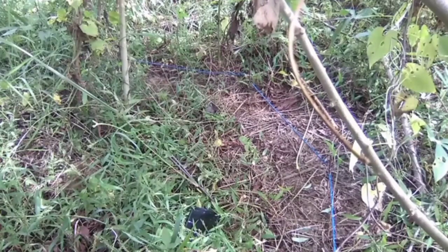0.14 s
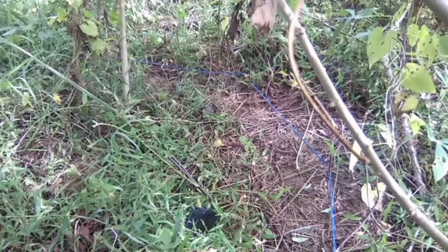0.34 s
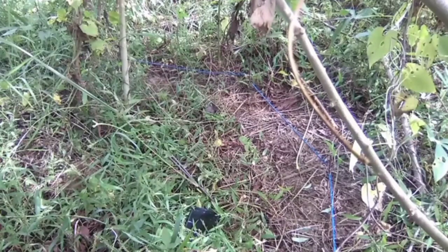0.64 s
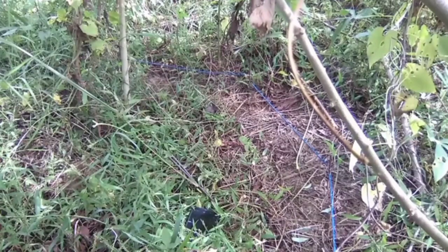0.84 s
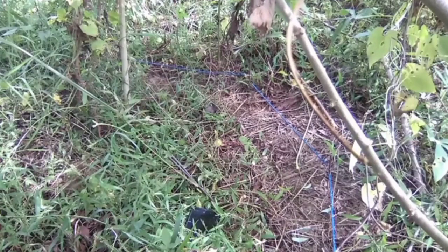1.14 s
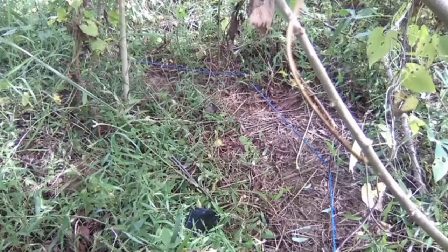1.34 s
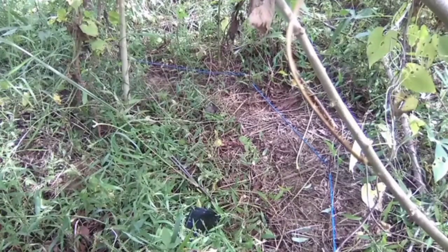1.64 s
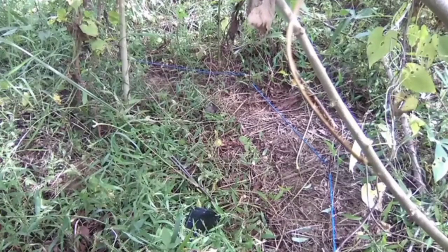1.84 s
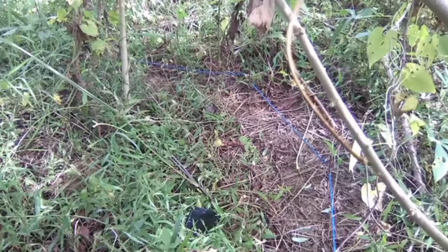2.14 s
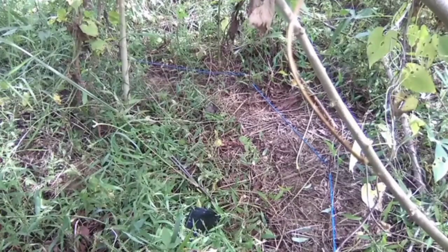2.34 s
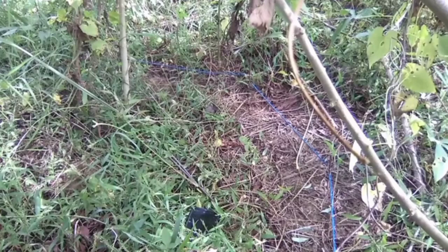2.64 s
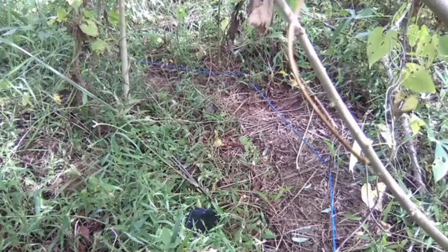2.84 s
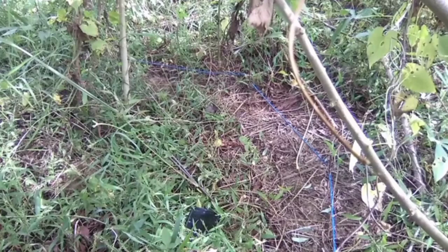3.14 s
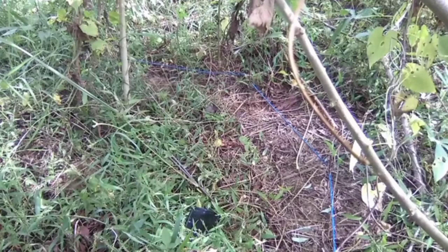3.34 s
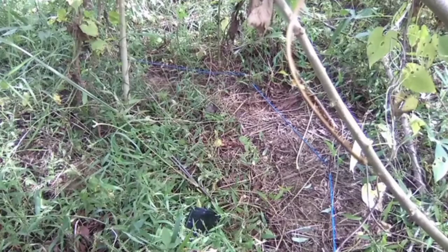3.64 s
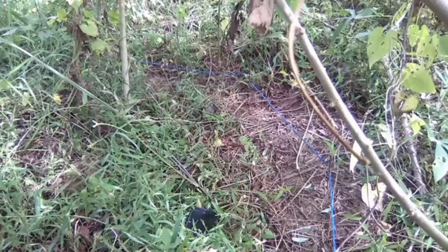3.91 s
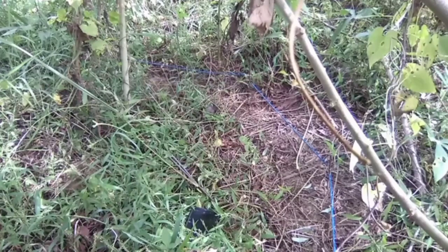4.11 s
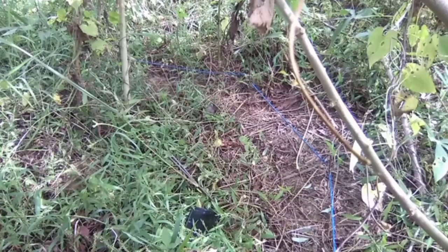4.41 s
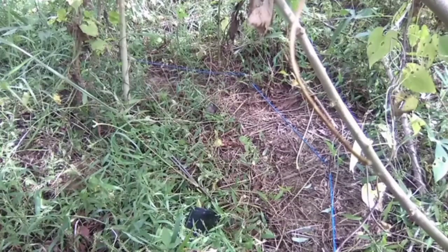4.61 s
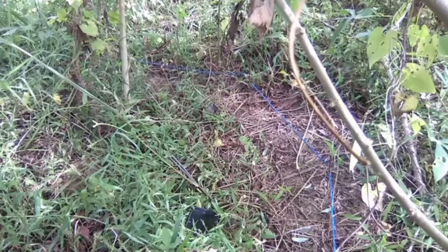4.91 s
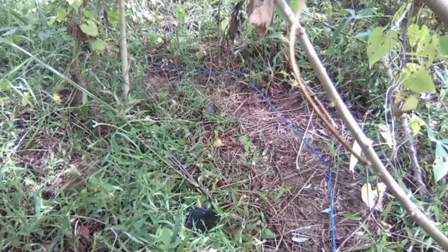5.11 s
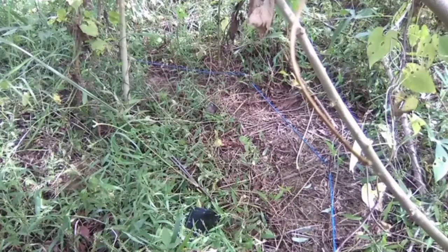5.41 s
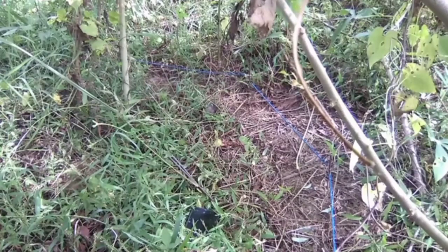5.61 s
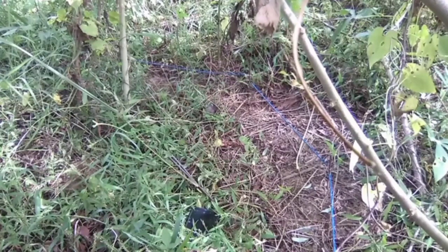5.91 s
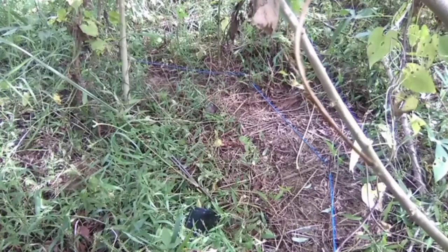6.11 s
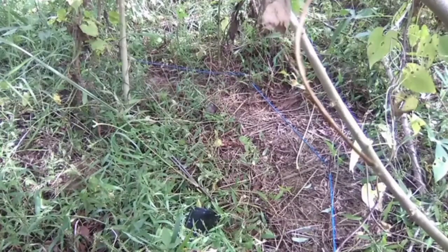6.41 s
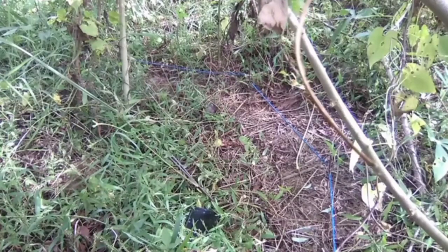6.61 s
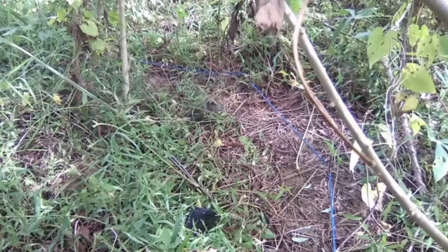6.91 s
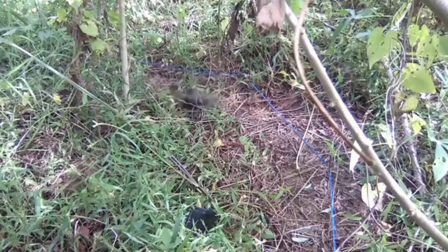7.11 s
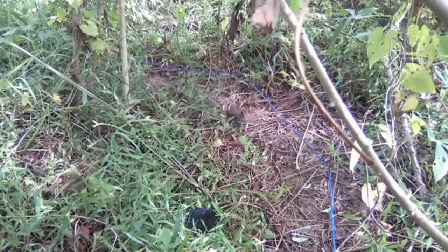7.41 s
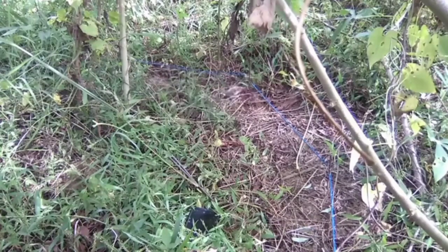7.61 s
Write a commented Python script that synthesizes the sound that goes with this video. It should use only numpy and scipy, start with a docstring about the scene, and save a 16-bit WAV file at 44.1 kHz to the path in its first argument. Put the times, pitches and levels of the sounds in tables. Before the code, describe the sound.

Undergrowth under trees, one close microphone. A high, steady insect whine with pulsed cricket bouts runs throughout. A quail close by whistles two bright notes, a lower swelling one and a fading lowest one. After several seconds of insects and faint distant bird chips, a soft bump comes, the call repeats, and dry grass crackles under running feet.

```python
"""Undergrowth below trees, one microphone: a rock quail whistles two series of four notes close by.
Two bright notes, a lower swelling one and a lowest fading one: swept partials of a single voice.
Crickets and thin buzzes are pulsed tones and narrow noise; a small far bird is short glides and echo.
Filtered noise makes soft bumps of the stand, faint air and the quail's run through dry grass near the end."""
import sys
import numpy as np
from scipy import signal
from scipy.fft import rfft, irfft, next_fast_len
from scipy.io import wavfile
from scipy.ndimage import uniform_filter1d, map_coordinates

SR = 44100
rng = np.random.default_rng(int(sys.argv[2]) if len(sys.argv) > 2 else 0)


def bounce(signal):
    """Save signal as a 16-bit WAV file at the path given by the first command-line argument."""
    frames = np.transpose(np.atleast_2d(signal))
    limited = np.clip(frames, -1, 1)
    pcm = np.round(limited * 32767).astype(np.int16)
    wavfile.write(sys.argv[1], SR, pcm)


N = 341775
TIME = np.arange(N) / SR  # seconds

# All levels are relative, before echo and flicker; pitches are centres before any waver.
# The quail's two bright opening notes, which sag, bend upward and flick down.
# Each row: start in seconds, length in seconds, pitch in Hz, upward bend in Hz, level in dB.
BRIGHT_NOTES = [(.708, .127, 3381, 286, -36), (1.007, .1145, 3436, 149.4, -35.3),
                (5.887, .129, 3337, 280, -36), (6.183, .1175, 3395, 175, -36)]
# Its third note, held and then swelling as it droops.
# Each row: start in seconds, length in seconds, pitch in Hz, level in dB, swell in dB.
SWELLING_NOTES = [(1.254, .148, 3203, -42, 6.5), (6.429, .14, 3193, -39.5, 5)]
# Its last note, climbing a little, then sinking and fading.
# Each row: start in seconds, climb in seconds, fall in seconds, top pitch in Hz, level in dB.
FADING_NOTES = [(1.498, .049, .205, 2980, -44), (6.656, 0.058, 0.2096, 2974, -41.5)]
# Every note slides up into its pitch from a soft start.
SCOOP_S, SCOOP_HZ, ONSET_DB = .014, 186, -18.5
# Sag as a share of the bend; the voice thins at the top of the bend.
SAG_SHARE, CHOKE_DB = .28, -13.5
# The flick: time to its loudest moment, pitch and level there, last pitch.
FLICK_S, FLICK_HZ, FLICK_DB, FLICK_END_HZ = .0062, 3120, 2.5, 2726
# The third note: droop over the swell, then the closing drop.
DROOP_HZ, DROP_S, DROP_END_HZ = 197.6, .018, 2267
# The last note: its climb, then its even fall in pitch and level.
CLIMB_HZ, SINK_HZ_PER_S, FADE_DB_PER_S = 118.7, 2400, 91
# The throat passes the second harmonic and little above it. Each row: frequency in Hz, gain in dB.
THROAT = [(3800, 0), (4400, -13), (5500, -29)]
# The fundamental comes through best at the top of its range. Each row: its pitch in Hz, level in dB.
FUNDAMENTAL = [(1150, -76.5), (1260, -70.5), (1360, -69), (1480, -76.5), (1600, -74), (1690, -68.5),
               (1740, -63), (1820, -58.5)]
# Share of the overtones that leaves the beak. Each row: frequency in Hz, gain in dB.
BEAK = [(4350, -32.5), (4700, -45.5), (5200, -55.5), (5900, -51.5), (6600, -45.5), (8800, -48.5),
        (9600, -43), (10050, -25), (10400, -31.5), (11000, -49)]
# Overtones of the voice, as multiples of the fundamental.
BEAK_HARMONICS = (3, 4, 6)
# High notes add a tone an octave below the fundamental; the limit is the whistle's pitch.
SUBTONE_DB, SUBTONE_ABOVE_HZ = -58, 3260
# Air rushing through the throat. Each row: frequency in Hz, level in dB per Hz.
HUSK = [(500, -45.5), (900, -10.5), (1250, -20), (1750, -10), (2200, 1), (3100, 8.5), (3700, -3.5),
        (4300, -22), (6000, -58)]
# Grit as a bright note reaches its pitch. Each row: frequency in Hz, level in dB per Hz.
RASP = [(2500, -40), (3600, -4.5), (4100, 0), (4900, -5), (5600, -39.5)]
RASP_DB = -73

# Dry grass under the running bird. Each row: time in seconds, level in dB.
RUSTLE = [(6.821, -113), (6.854, -86), (7.025, -73.5), (7.086, -86.5), (7.236, -63.5), (7.426, -80),
          (7.614, -68), (7.702, -87), (7.75, -71)]
# Its footfalls. Each row: time in seconds, crackle level in dB, thud level in dB.
STEPS = [(7.004, -61, -94), (7.145, -64.5, -88), (7.212, -50.5, -61.5), (7.228, -71, -97),
         (7.292, -54.5, -79.5), (7.53, -69.5, -76), (7.605, -69, -94)]
# Colour of brushed dry grass. Each row: frequency in Hz, level in dB per Hz.
GRASS = [(350, -52), (600, -33), (854, -24.5), (1250, -33), (1410, -26.5), (2780, -16), (4130, -17.5),
         (6550, -9), (9190, -28.5), (10200, 1), (15400, -16.5)]
# Colour of the thuds on the ground. Each row: frequency in Hz, level in dB per Hz.
GROUND = [(60, -20), (160, -5), (300, -10.5), (480, -5), (650, -22), (1500, -20.5), (3000, -74)]

# The near cricket's bouts. Each row: start in seconds, end in seconds, level in dB.
CRICKET_BOUTS = [(0.157, 0.55, -65), (0.828, 1.332, -64.5), (1.611, 2.223, -63.5), (2.618, 3.167, -62.5),
                 (3.413, 3.8, -62), (3.854, 4.051, -60.5), (4.28, 4.863, -63.5), (5.055, 5.544, -58),
                 (5.891, 6.39, -59), (6.666, 7.19, -61), (7.418, 7.753, -61)]
BOUT_ARCH_DB = 1.5  # a bout is softer at its ends than in its middle
# A fast trill with a few pauses. Each row: start in seconds, end in seconds, level in dB.
TRILL_BOUTS = [(0, 0.735, -68.5), (1.544, 5.067, -68), (5.616, 6.557, -67.5), (7.417, 7.75, -66.5)]
TRILL_RISE_DB_PER_S, TRILL_FALL_DB_PER_S = 259.5, 199.5
# Another cricket far behind it. One row: start in seconds, end in seconds, level in dB.
FAINT_TRILL = (0, 5.1, -86)
# A higher, pulsing insect, briefly. Each row: start in seconds, end in seconds, level in dB.
HIGH_TRILL = [(0, 0.253, -70.5), (7.288, 7.752, -79.5)]
# Thin insect buzzes. Each row: start in seconds, length in seconds, level in dB.
BUZZES = [(0.046, 0.28, -73), (0.801, 0.36, -69.5), (1.52, 0.31, -72), (2.261, .25, -76),
          (3.063, 0.29, -73.5), (3.748, 0.18, -82.5), (3.899, 0.19, -72.5), (4.569, 0.26, -75),
          (5.217, 0.31, -78.5), (6.15, 0.25, -74)]

# The far bird's notes. Each row: start in seconds, pitch in Hz, glide in Hz, level in dB.
CHIPS = [(.027, 1320, -50, -89), (.44, 3970, -140, -84), (.447, 3460, -620, -80.5),
         (0.545, 2130, 78.5, -83.5), (.575, 3070, 260.5, -71), (.603, 2883, -87.5, -64.5),
         (0.646, 2780, -93, -69), (2.25, 2196, 61, -94), (2.27, 3010, -61, -82.5), (2.812, 2210, 0, -85),
         (2.925, 2200, -27, -81.5), (2.96, 2900, -150, -78), (2.964, 3250, -67.5, -64),
         (3.007, 2736, -150, -72.5), (3.048, 2623, 209.5, -64), (3.301, 2845, -39, -83.5),
         (3.64, 2940, -41, -89), (4.24, 2183, -67, -83), (4.254, 4140, -100, -89), (4.305, 2880, -93, -88),
         (4.376, 2830, 30, -80.5), (4.379, 3157, -9, -70), (4.445, 2634, -46.5, -75),
         (4.474, 2887, -460, -75), (5.195, 2510, -200, -95.5), (5.66, 2186, 34.5, -87.5),
         (5.81, 3100, -75.5, -72), (5.838, 2884, -210, -78), (7.478, 3844, -210, -75),
         (7.568, 2080, 161, -73.5), (7.595, 3000, -55, -71), (7.63, 2840, -370, -76.5)]
CHIP_S = .046  # length of each note
# Decay of the echo among the trees. Each row: frequency in Hz, time to fall 60 dB in seconds.
WOOD = [(200, 0.24), (3000, .45), (10000, 0.037)]

# Soft bumps on the microphone's stand.
# Each row: start in seconds, level in dB, time to fall 60 dB in seconds.
BUMPS = [(3.0, -75, 0.38), (3.2, -85, .3), (4.392, -66, 0.73), (4.52, -83, 0.22), (5.385, -69, 0.2),
         (6.062, -50, 0.44), (6.24, -64, 0.31), (6.929, -74.5, 0.22)]
# Colour of the shaken stand. Each row: frequency in Hz, level in dB per Hz.
STAND = [(20, -28), (38, -21.5), (55, -2.5), (78, 3), (110, -4), (150, -6), (210, -18), (300, -42.5),
         (600, -55.5), (1500, -87.5)]
# Dull knocks in the undergrowth.
# Each row: start in seconds, pitch in Hz, level in dB, time to fall 60 dB in seconds.
KNOCKS = [(0.609, 585, -84, 0.16), (2.19, 594, -84, .1), (2.62, 183, -80, 0.51)]

# Faint rumbling air. Each row: frequency in Hz, level in dB per Hz.
AIR = [(20, -20), (40, -11), (70, 4.5), (110, -6), (200, -11.5), (400, -15.5), (1000, -19.5), (3000, -22),
       (6000, -21), (11000, -23.5), (15500, -25.5)]
# Distant insects. Each row: frequency in Hz, level in dB per Hz.
CHORUS = [(5000, -64), (7500, -22), (8000, -17.5), (8400, -2), (8800, 3), (9200, -5.5), (9600, -16.5),
          (11000, -32), (14000, -67)]
TOP_HZ = 15500


def quail():
    """The throat favours the second harmonic; the bright notes end in a sharp, rough downward flick."""
    notes = [bright_note(*row) for row in BRIGHT_NOTES]
    notes += [swelling_note(*row) for row in SWELLING_NOTES]
    notes += [fading_note(*row) for row in FADING_NOTES]
    notes.sort()
    s, pitch, db = np.concatenate(notes).T
    hz = np.interp(TIME, s, pitch)
    sounding = sum(gate(path[0][0], path[-1][0], edge=.0035) for path in notes) ** 2
    # the voice falters on the highest pitches
    choked = np.clip((hz - 3430) / 150, 0, 1)
    # the blow moves evenly from point to point, and the sound grows with its square
    blowing = np.interp(TIME, s, np.sqrt(amp(db)))
    level = sounding * blowing ** 2 * amp(0.86 * wobble(90) + 3 * choked * flicker(130))
    # the tone breaks up while its pitch is falling fastest
    flick = sounding * np.clip(-np.gradient(hz) * SR / 45000, 0, 1) ** 2
    flick = uniform_filter1d(flick, size=130)
    hz = uniform_filter1d(hz, size=180) * (1 + .0024 * wobble(220) + .012 * flick * wobble(600))
    phase = phase_of(hz / 2)  # of the fundamental
    level = uniform_filter1d(level, size=30)
    whistle = filtered(level * np.sin(2 * phase), lambda f: amp(along(THROAT, f)))

    # the fundamental saturates at a soft blow; above that pitch sets its level, with a flicker
    saturated = np.tanh(level / amp(-57.5))
    fundamental = saturated * amp(along(FUNDAMENTAL, hz / 2) - 1 + 5 * flicker(35)) * np.sin(phase)
    # overtones come and go, and need a strong, steady blow
    effort = level / level.max()
    partials = sum(amp(along(BEAK, k * hz / 2) + 1.5 + 8 * flicker(40)) * np.sin(k * phase)
                   for k in BEAK_HARMONICS)
    overtones = level * effort * (1 - flick) * partials
    subtone_gain = (hz > SUBTONE_ABOVE_HZ) * amp(SUBTONE_DB + 9 * flicker(44))
    subtone = level * subtone_gain * np.sin(phase / 2 + wobble(120))
    voice = np.sqrt(2) * (whistle + fundamental + overtones + subtone)

    husk = level * effort * (amp(-35.5) + amp(-22.5) * flick) * noise(HUSK)
    near = amp(-20) * leaves(voice, t60=0.048) + amp(-11) * leaves(flick * whistle, t60=0.091)
    # the lower partial carries further into the trees, and the overtones scatter widely
    far = amp(-32) * trees(voice) + amp(-15.5) * trees(fundamental) + amp(-10.5) * trees(husk)
    far += amp(-5) * leaves(overtones, t60=0.21)
    grit = sum(blow(row[0] + SCOOP_S, t60=0.12, attack=.002) for row in BRIGHT_NOTES)
    rasp = amp(RASP_DB) * grit * noise(RASP)
    return voice + husk + rasp + near + far


def bright_note(s, length, hz, bend, db):
    """(s, Hz, dB) path: scoop, shallow sag, a choked upward bend and a loud flick."""
    top = s + length
    return [(s, hz - SCOOP_HZ, db + ONSET_DB),
            (s + SCOOP_S, hz, db),
            (s + 0.47 * length, hz - SAG_SHARE * bend, db + 0.33),
            (s + .75 * length, hz + .08 * bend, db - 1.4),
            (top, hz + bend, db + CHOKE_DB),
            (top + FLICK_S, FLICK_HZ, db + FLICK_DB),
            (top + 2.3 * FLICK_S, FLICK_END_HZ, db - 21.5)]


def swelling_note(s, length, hz, db, swell_db):
    """(s, Hz, dB) path: scoop, hold, a drooping swell and a drop."""
    end = s + length
    return [(s, hz - SCOOP_HZ, db + ONSET_DB),
            (s + SCOOP_S, hz, db - 1),
            (s + 0.5 * length, hz - 8, db + .6),
            (s + .74 * length, hz - .6 * DROOP_HZ, db + swell_db),
            (end, hz - DROOP_HZ, db + swell_db - 2.5),
            (end + DROP_S, DROP_END_HZ, db - 22)]


def fading_note(s, climb, fall, hz, db):
    """(s, Hz, dB) path: a slow climb, then pitch and level sink almost evenly until the voice stops."""
    top = s + climb
    end_hz, end_db = hz - SINK_HZ_PER_S * fall, db - FADE_DB_PER_S * fall
    return [(s, hz - CLIMB_HZ, db + ONSET_DB),
            (s + .4 * climb, hz - .55 * CLIMB_HZ, db - 4),
            (top, hz, db + 3),
            (top + fall / 4, (3 * hz + end_hz) / 4, (3 * db + end_db) / 4 - 0.5),
            (top + fall, end_hz, end_db),
            (top + fall + .012, end_hz - 60, end_db - 2)]


def running():
    """Dry grass brushes past in dense grains; each footfall adds a crackle and a light thud."""
    s, db = np.transpose(RUSTLE)
    brushing = amp(np.interp(TIME, s, db) + 2) * gate(s[0], s[-1], edge=.02)
    crackle = sum(amp(crackle_db) * blow(s, t60=0.1, attack=0.0017) for s, crackle_db, _ in STEPS)
    thud = sum(amp(thud_db) * blow(s, t60=0.14, attack=0.0028) for s, _, thud_db in STEPS)
    grains = noise(GRASS, sizes=amp(2.2 * wobble(900) + 2.5 * wobble(90)))
    snaps = amp(7.5) * stalks(per_second=210, pitch_hz=7640)
    return (brushing + crackle) * (grains + snaps) + thud * noise(GROUND)


def stalks(per_second, pitch_hz):
    """Single stalks snap at random moments, each dying within a few cycles."""
    ticks, t = np.zeros(N), np.arange(SR // 200) / SR
    start, end = RUSTLE[0][0], min(RUSTLE[-1][0], TIME[-len(t) - 1])
    for when, pitch, size in rng.random((int(per_second * (end - start)), 3)):
        hz = pitch_hz * 2 ** (2 * pitch - 1)  # up to an octave either way
        ring = np.sin(2 * np.pi * hz * t) * np.exp(-hz * t / 4)
        first = int((start + when * (end - start)) * SR)
        ticks[first:first + len(t)] += size ** 3 * ring
    return ticks


def near_cricket():
    """Bouts of separate, piercing syllables; each bout swells and eases."""
    bouts = np.zeros(N)
    for start, end, db in CRICKET_BOUTS:
        span = slice(int(start * SR), int(end * SR))
        u = np.clip((TIME[span] - start) / (end - start), 0, 1)
        closing = np.minimum((end - TIME[span]) / 0.0064, 1)
        bouts[span] = amp(db - BOUT_ARCH_DB * (2 * u - 1) ** 2) * closing
    syllables = stridulation(9040, 36.9, duty=.72, sag_hz=72, scatter_db=2.35, drift_hz=22.7,
                             starts=[row[0] for row in CRICKET_BOUTS])
    song = bouts * amp(1.58 + 3.7 * flicker(14)) * syllables
    return song + amp(-6.5) * leaves(song, t60=0.18)


def trills():
    """A fast trill with a fuzzy lower tone; a fainter cricket and a higher insect join the whine."""
    slopes = [db - TRILL_RISE_DB_PER_S * np.maximum(start - TIME, 0)
              - TRILL_FALL_DB_PER_S * np.maximum(TIME - end, 0) for start, end, db in TRILL_BOUTS]
    singing = amp(np.max(slopes, axis=0))
    wavering = singing * amp(-0.5 + 0.43 * wobble(7.7))
    fast = wavering * stridulation(7238, 51, duty=1, sag_hz=39.6, scatter_db=1, drift_hz=23.4)
    lower = singing * amp(-4.5) * narrow(7035, width_hz=120)
    start, end, faint_db = FAINT_TRILL
    faint = amp(faint_db) * gate(start, end, edge=0.088) * narrow(7100, width_hz=210)
    joining = sum(amp(db) * gate(start, end, edge=.03) for start, end, db in HIGH_TRILL)
    high = joining * stridulation(7650, 17, duty=1, sag_hz=30, scatter_db=1.5, drift_hz=70)
    return fast + lower + faint + high + leaves(fast, t60=.12)


def stridulation(pitch_hz, rate, duty, sag_hz, scatter_db, drift_hz, starts=()):
    """Each wing stroke is a smooth tone pulse that sags in pitch as the wing slows; rate in strokes/s."""
    strokes = np.cumsum(rate * (1 + 0.02 * wobble(25))) / SR
    for s in starts:  # a bout starts with a fresh stroke
        strokes[int(s * SR):] += -strokes[int(s * SR)] % 1
    count = strokes.astype(int)
    u = np.minimum((strokes - count) / np.clip(duty, .1, 1), 1)
    size = amp(scatter_db * rng.standard_normal(N // 100))[count]
    hz = pitch_hz + sag_hz * (.5 - u) + drift_hz * wobble(150)
    return unit(size * np.sin(np.pi * u) ** 2 * np.sin(phase_of(hz)))


def buzzes():
    """A thin band of noise swells and stops, mostly about every three quarters of a second."""
    swell = sum(amp(db) * np.interp(TIME, [s, s + .7 * length, s + length], [0, 1, 0])
                for s, length, db in BUZZES)
    return swell * narrow(10590, width_hz=220)


def far_bird():
    """Short wavering notes far off among the trees, with a softer echo."""
    song, quiver = np.zeros(N), 50 * wobble(200)  # quiver in Hz
    u = np.linspace(0, 1, int(CHIP_S * SR))
    swell = np.sqrt(np.abs(np.sin(np.pi * u)))
    for s, hz, glide_hz, db in CHIPS:
        span = slice(int(s * SR), int(s * SR) + len(u))
        song[span] += amp(db) * swell * np.sin(phase_of(hz + glide_hz * u + quiver[span]))
    song *= 1 + 0.088 * wobble(220)
    return amp(5) * song + leaves(song, t60=0.2) + amp(-5.5) * trees(song)


def bumps():
    """Dull shudders of the stand, and faint knocks in the undergrowth."""
    shudders = noise(STAND) * sum(amp(db) * blow(s, t60, attack=0.0055) for s, db, t60 in BUMPS)
    knocks = sum(amp(db) * blow(s, t60, attack=0.008) * narrow(hz, width_hz=31)
                 for s, hz, db, t60 in KNOCKS)
    return shudders + knocks


def background():
    """Faint rumbling air and a blur of distant insects, both as slowly wavering coloured noise."""
    air = amp(-87.5 + 0.23 * wobble(1.5)) * noise(AIR)
    chorus = amp(-74.5 + 0.44 * wobble(2.3)) * noise(CHORUS)
    return air + chorus


def trees(x):
    """Diffuse echo from trunks and leaves: a noise tail whose decay time depends on frequency."""
    hz, t, z = signal.stft(rng.standard_normal(SR), SR, nperseg=256)
    tail = signal.istft(z * amp(-60 * t / along(WOOD, hz)[:, None]), SR, nperseg=256)[1]
    return signal.fftconvolve(x, tail / np.linalg.norm(tail))[:N]


def leaves(x, t60):
    """Dense, brief scatter from the plants close by."""
    t = TIME[:SR // 8]
    scatter = rng.standard_normal(len(t)) * amp(-60 * t / t60)
    return signal.oaconvolve(x, scatter / np.linalg.norm(scatter))[:N]


def blow(s, t60, attack):
    """Envelope of a blow that rises and dies away."""
    envelope, first = np.zeros(N), int(s * SR)
    t = TIME[:min(SR, N - first)]
    envelope[first:first + len(t)] = (1 - np.exp(-t / attack)) * amp(-60 * np.minimum(t / t60, 3))
    return envelope


def narrow(hz, width_hz):
    """A fuzzy tone: noise in a narrow band."""
    phase = 2 * np.pi * hz * TIME
    return unit(wobble(width_hz) * np.sin(phase) + wobble(width_hz) * np.cos(phase))


def noise(spectrum, sizes=1):
    """Coloured noise of rms 1; uneven sizes make it grainy."""
    return unit(filtered(sizes * rng.standard_normal(N), lambda hz: amp(along(spectrum, hz))))


def filtered(x, response):
    """x times a response of frequency."""
    m = next_fast_len(N + SR // 2)
    return irfft(rfft(x, m) * response(np.fft.rfftfreq(m, 1 / SR)), m)[:N]


def wobble(rate):
    """A smooth random curve, rate knots a second."""
    knots = rng.standard_normal(int(N * rate / SR) + 4)
    steps = np.arange(0, len(knots) - 1, 1 / 10)
    return np.interp(TIME * rate, steps, map_coordinates(knots, [steps]))


def flicker(rate):
    """A smooth random curve kept between -1 and 1."""
    return np.tanh(wobble(rate))


def phase_of(hz):
    """Running phase of a changing frequency, in radians."""
    return 2 * np.pi * np.cumsum(hz) / SR


def gate(start, end, edge):
    """1 between start and end, fading over edge seconds outside."""
    return np.clip(np.minimum(TIME - start, end - TIME) / edge + 1, 0, 1)


def along(points, hz):
    """Value at hz from (Hz, value) points, joined on a log frequency axis."""
    f, v = np.transpose(points)
    return np.interp(np.log(hz + 1), np.log(f + 1), v)


def amp(db):
    """Decibels to gain."""
    return np.exp(np.asarray(db) * (np.log(10) / 20))


def unit(x):
    """Scale to rms 1."""
    return x / np.sqrt(np.mean(x ** 2) + 1e-20)


def scene():
    """Everything at one microphone."""
    birds = quail() + far_bird()
    insects = near_cricket() + trills() + buzzes()
    return (birds + insects + bumps() + running() + background())[None]


def record(dry):
    """The microphone channel keeps nothing above its band limit."""
    return filtered(dry[0], lambda hz: hz < TOP_HZ)[None]


dry = scene()
out = record(dry)
bounce(out)
```